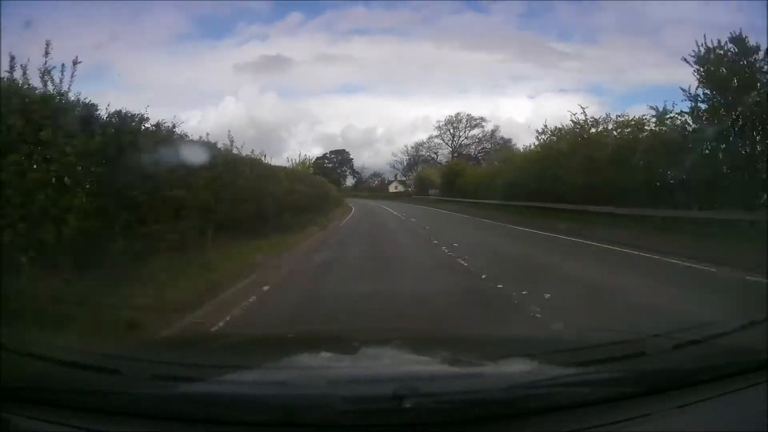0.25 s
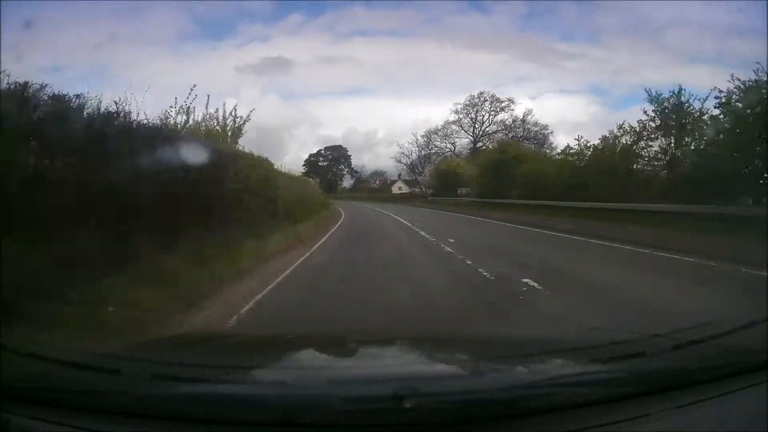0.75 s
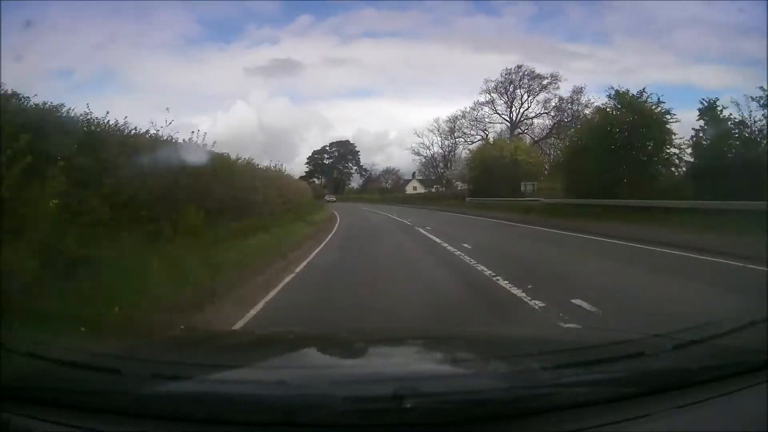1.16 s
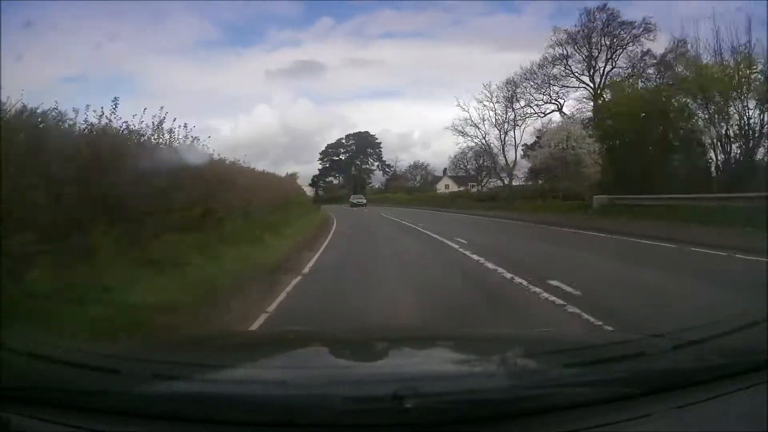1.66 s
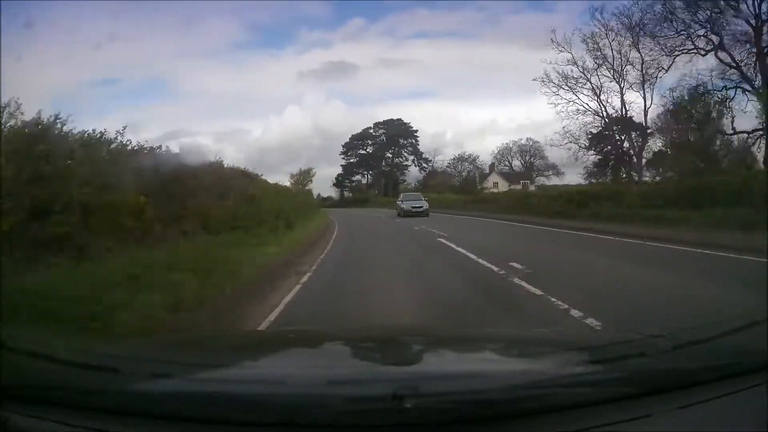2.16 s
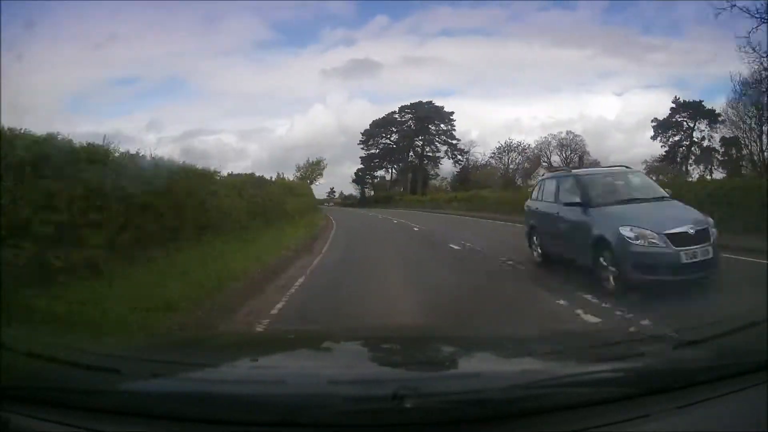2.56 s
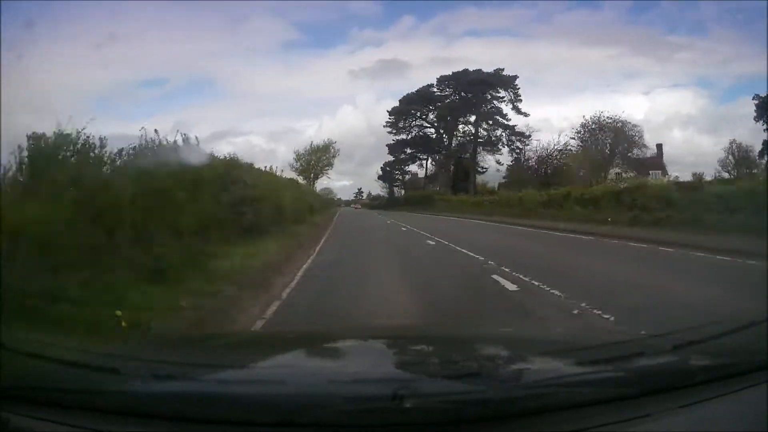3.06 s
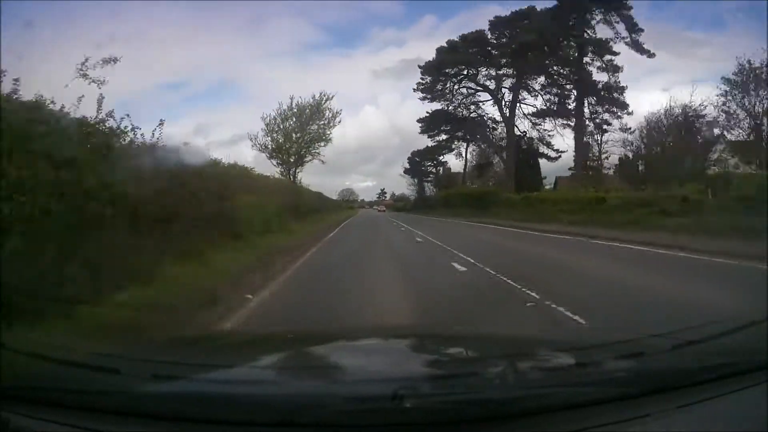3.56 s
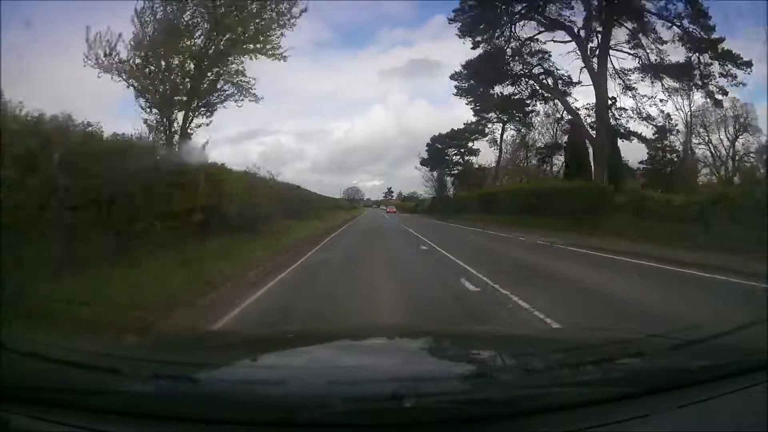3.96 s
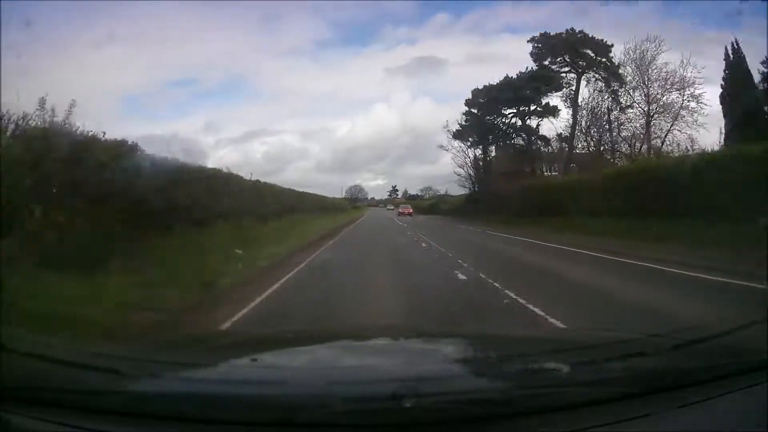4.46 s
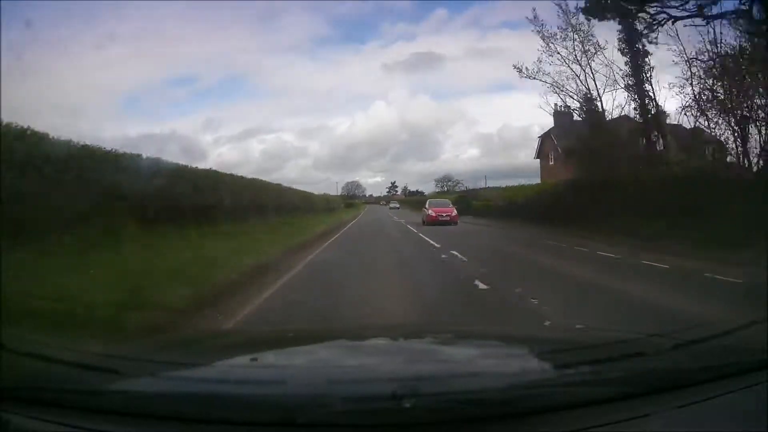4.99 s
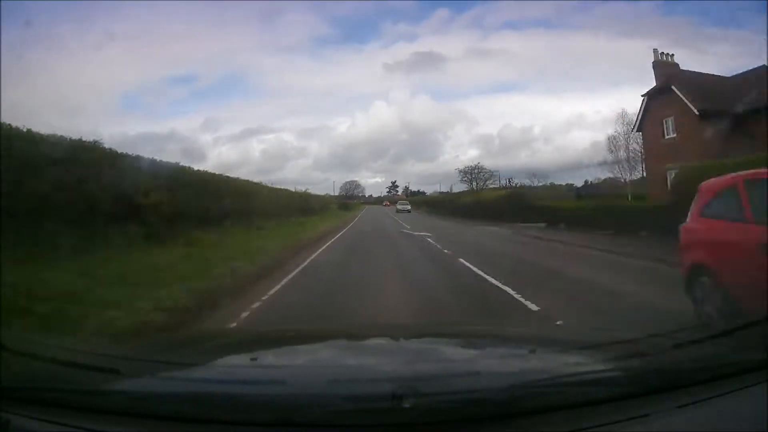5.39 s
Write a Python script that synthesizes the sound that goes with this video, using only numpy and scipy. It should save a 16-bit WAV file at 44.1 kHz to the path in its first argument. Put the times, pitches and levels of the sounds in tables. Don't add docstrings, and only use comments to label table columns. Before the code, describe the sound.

Continuous enclosed cabin noise: deep rumble, broad tyre roar and thin wind hiss. Very near the microphone, a brittle plastic part knocks and scrapes in irregular bright ticks, busiest midway, then sparse and gone after four seconds. Under it a five-cylinder engine hums, eases off and dips, then opens up smoothly, growing rougher and louder while its pitch climbs a little. One sharp stone flick sounds before the pull.

```python
import sys
import numpy as np
from scipy import signal
from scipy.fft import rfft, irfft, next_fast_len
from scipy.io import wavfile
from scipy.ndimage import uniform_filter1d

SR = 44100
rng = np.random.default_rng(int(sys.argv[2]) if len(sys.argv) > 2 else 0)


def unload_wav(signal):
    wavfile.write(
        sys.argv[1],
        SR,
        np.round(np.clip(np.atleast_2d(signal).T, -1, 1) * 32767).astype(np.int16),
    )


def volts(x):
    e = np.asarray(x, float) / 20
    return 10 ** e


N = 248283

# (time [s], level [dB])
THROTTLE = [
    (0, 8.5),
    (1.2, 6.5),
    (2.25, 3.5),
    (2.62, 12),
    (2.9, 18.5),
    (3.7, 22),
    (4.4, 25.5),
    (5.1, 26),
    (5.63, 25),
]
# (time [s], firing rate [Hz])
PACE = [(0, 131.6), (.62, 130.1), (1.56, 127.4), (2.19, 125.3), (3.12, 125.7), (4.06, 128.1), (4.69, 131),
        (5.31, 134.6), (5.63, 135.3)]


def rms_one(x):
    return x / np.sqrt(np.mean(x ** 2) + 1e-20)


def in_time(rows):
    s, value = np.transpose(rows)
    return np.interp(np.arange(N) / SR, s, value)


def drift(rate):
    r = np.exp(-80 * np.pi * rate / SR)
    noise = rng.standard_normal(N // 40 + 2002)
    slow = signal.lfilter([1], [1, -2 * r, r * r], noise)[2000:]
    return np.interp(np.arange(N) / 40, np.arange(len(slow)), rms_one(slow))


def ring(clicks, hz, t60):
    r = volts(-60 / (max(t60, .002) * SR))
    w = 2 * np.pi * hz / SR
    return signal.lfilter([0, np.sin(w)], [1, -2 * r * np.cos(w), r * r], clicks + 1e-18)


def lift(hz, peaks):
    return sum(lift_db / (1 + (2 * (hz - top) / width) ** 2) for top, width, lift_db in peaks)


def coloured(spectrum):
    # (centre [Hz], width [Hz], lift [dB])
    cabin = [(887, 17, 7.5), (940, 18, 4), (2513, 390, -6.5), (3320, 48, 8.5), (4370, 790, 9),
             (5530, 490, 13.5), (6950, 300, 6.5), (7500, 1800, 2.5)]
    size = next_fast_len(N)
    hz = np.arange(1, size // 2 + 2) * SR / size
    points_hz, points_db = np.transpose(spectrum)
    level_db = np.interp(np.log(hz), np.log(points_hz), points_db, left=-90, right=-90)
    level_db += lift(hz, cabin)
    return rms_one(irfft(rfft(rng.standard_normal(size)) * volts(level_db), size)[:N])


def body_rumble(texture):
    # (frequency [Hz], level [dB per Hz])
    rumble_spectrum = [(20, -14), (40, -3.5), (65, -10.5), (105, -3.5), (130, 4), (170, -4), (260, -38.5)]
    return volts(-35.5 + 1.5 * texture) * coloured(rumble_spectrum)


def wind_hiss(texture):
    # (frequency [Hz], level [dB per Hz])
    wind_spectrum = [(1500, -1.5), (2000, -6.5), (2500, 7.5), (3000, -11), (5000, -24.5), (7600, -34.5),
                     (8300, -44), (9000, -43.5), (9700, -51), (11200, -37), (12000, -36.5), (13000, -40.5),
                     (15700, -48)]
    faster_hz = in_time(PACE) - 127.8
    wind_db = -42.5 + 0.3859 * faster_hz + 0.09 * in_time(THROTTLE)
    return volts(wind_db + 0.19 * texture + 1.36 * drift(50)) * coloured(wind_spectrum)


def tyre_roar(texture):
    # (time [s], level [dB])
    tarmac = [(0, -18.5), (.38, -18.5), (.75, -20.5), (1.22, -17.5), (2.07, -21), (2.4, -19), (2.76, -20.5),
              (3.23, -19.5), (4.23, -21.5), (4.59, -18), (4.94, -18.5), (5.63, -17.5)]
    # (frequency [Hz], level [dB per Hz])
    tyre_spectrum = [(260, -29.5), (450, -20), (515, -15), (629, -10), (684, -12.5), (739, -8), (957, -3.5),
                     (1260, -8.5), (1460, -17.5), (1530, -17), (2100, -34), (2730, -64.5), (4620, -120)]
    return volts(in_time(tarmac) + 0.37 * texture + 0.45 * drift(36)) * coloured(tyre_spectrum)


def stone():
    # (time [s], level [dB])
    touches = [
        (2.6210, -1),
        (2.6255, -6),
        (2.6290, -9),
        (2.6350, -14),
        (2.6432, -15),
    ]
    # (frequency [Hz], level [dB], fade by 60 dB [s])
    panel = [(1070, 2, 0.0089), (1390, 7, 0.0032), (1910, -9.5, 0.032), (2520, 1.5, 0.014),
             (2580, 6, 0.0036), (3220, -6, 0.008), (4030, -5.5, 0.0076), (4210, -5.5, 0.0075),
             (4430, -6.5, 0.0065), (5700, -21, 0.015), (6550, -25, 0.0071), (7600, -25, 0.011),
             (11400, -27, 0.0069), (14000, -42, 0.0053)]
    out, force = np.zeros(N), np.zeros(N)
    steps = np.arange(1500)
    for s, db in touches:
        grit = rng.standard_normal(1500) * np.exp(-steps / 300)
        touch = (steps == 0) + .09 * grit
        if s > touches[0][0]:
            touch = signal.lfilter([1, -1], [1, -.75], touch)
        start = int(s * SR)
        force[start:start + 1500] += volts(db - 4) * touch
    for k, (hz, level_db, t60) in enumerate(panel):
        out += volts(level_db) * ring(force, hz, t60) * (-1) ** k
    return out


def rattles():
    # (time [s], peak [dB], top
    # modes [dB], scrape before the hit [ms], scrape level [dB])
    trim_hits = [(.0083, -22, -33, 12, -28), (0.1175, -19.5, -11, 12, -8), (0.165, -17.5, -22, 1.4, -32),
                   (.35, -37, -31.5, 2.6, -38), (.43, -33, -21, 4.6, -4), (.5023, -25, -31, 3.1, -39),
                   (0.5242, -21.5, -26.5, 5.7, -33), (0.641, -19, -9, 5.7, -30), (0.6484, -22, -15, 5.1, -25),
                   (1.072, -22, -14, 4, -34.5), (1.121, -19.5, -16, 2.4, -10), (1.149, -21.5, -12, 3.8, 0.5),
                   (1.1789, -20.5, -13, 2.4, 4.5), (1.2105, -27, -37, 4, -32), (1.3078, -17.5, -11, 4, -33.5),
                   (1.338, -22, -15, 12, -28.5), (1.3996, -16.5, -10.5, 9.5, -14), (1.478, -22, -17, 4.7, -32),
                   (1.5602, -15.5, -9, 6.4, -12), (1.585, -19.5, -13, 3.6, -35), (1.668, -12.5, -7, 2.9, -15),
                   (1.6964, -18, -11, 4.3, -18), (1.7223, -19.5, -13.5, 5.9, -25), (1.88, -28, -20, 4.5, -34),
                   (1.9111, -12.5, -10.5, 6.6, -18), (1.9909, -6, -13, 1.9, -17), (2.047, -16.5, -13, 2.6, -0.5),
                 (2.123, -14.5, -12, 5.2, -10), (2.1535, -13.5, -9, 9.4, -27), (2.194, -28.5, -12.5, 3.6, 0),
                 (2.2386, -10, -14, 9.5, -18), (2.28, -23.5, -12, 6.1, 3.5), (2.329, -9, -11.5, 5, -19),
                 (2.3764, -12.5, -15, 1.4, -15.5), (2.411, -16.5, -13, 1.1, 0.5), (2.418, -15, -26, 1.9, -28),
                 (2.4223, -20.5, -27, 4.7, -30), (2.512, -8.5, -12.5, 6.5, -18.5),
                 (2.561, -9.5, -13, 5.4, -29), (2.612, -13, -14, 5, -9), (2.6526, -22, -15.5, 9.7, -28),
                 (2.6805, -18, -17.5, 6.5, -30), (2.7258, -20, -18, 6.4, -30), (2.8, -32, -15, 9, 1),
                   (2.858, -11, -13.5, 2.7, -8), (2.908, -13.5, -11, 4.3, -7), (2.9478, -17, -13, 3.8, -0.5),
                  (2.9955, -12.5, -17, 1.4, -7.5), (3.0458, -14, -16, 5.1, -10.5), (3.08, -18, -15, 4, -22),
                  (3.1235, -27, -19, 2.8, -32), (3.15, -20, -14, 3.6, -28), (3.2186, -11, -14, 5.8, -17),
                  (3.2973, -9.5, -12, 6.2, -23), (3.3464, -14.5, -15, 5.3, -5.5), (3.6737, -19, -9, 6.6, -30),
                  (3.755, -23.5, -15, 14, -24), (3.95, -15, -10.5, 3.3, -32), (4.01, -23, -16, 8.7, -28),
                  (4.074, -20.5, -16, 2.6, -30)]
    # (offset from the hit [s], loss [dB])
    chatter = [
        (-.012, 29),
        (.010, 35),
    ]
    s, peak_db, top_db, lead_ms, lead_db = np.transpose(trim_hits)
    luck = rng.standard_normal((len(s), 3))
    low_db = -2 + 0.49 * (peak_db + 13) - .25 * (top_db + 17) + 2 * luck[:, 0]
    rows = [(s, peak_db, low_db, top_db, lead_ms, lead_db)]
    one = np.ones(len(s))
    for k, (offset_s, loss_db) in enumerate(chatter):
        tap_s = np.maximum(s + offset_s * (1 + .25 * luck[:, 1 + k]), .013)
        rows.append((tap_s, peak_db - loss_db, -6 * one, -1.5 * one, 2.4 * one, -30 * one))
    return np.hstack(rows)


def trim():
    # (frequency [Hz], level [dB], fade by 60 dB [s])
    plastic = [(1870, -3, .005), (2250, 2, .008), (2500, 6, .009), (2800, -1, .008), (3370, -4, .009),
               (4000, -3, .008), (4450, -1, .007), (4800, -6, .007), (5280, -16, .01), (5820, -8, .008),
               (6500, -12, .008), (7250, -20, .006), (7700, -18, .008), (10150, -4, .006),
               (10900, -8, .008), (11700, -1, .005), (12750, -9, .008), (13250, -4, .006),
               (13900, -4, .006), (14850, -1, .005), (15500, -14, .005)]
    soft_db, soft_slope = -13, .6
    buzz_db, buzz_s = -56, 0.041
    s, peak_db, low_db, top_db, lead_ms, lead_db = rattles()
    at = (s * SR).astype(int)
    lead = np.clip(lead_ms * SR / 1000, 1, 480).astype(int)

    steps = np.arange(700)
    since_hit = steps - lead[:, None]
    grit = rng.standard_normal((len(at), 700)) * (rng.random((len(at), 700)) < .25)
    rub = .5 * grit * np.exp(np.minimum(since_hit, 0) / 300) * (since_hit < 0)
    tick = 0.9 * (steps == 0)
    scrape = volts(lead_db + 5)[:, None] * (rub + tick)
    settle = .2 * grit * np.exp(-np.maximum(since_hit, 0) / 50) * (since_hit > 0)
    blows = scrape + (since_hit == 0) + settle
    spots = (at - lead)[:, None] + steps
    share_db = rng.normal(0, 1.0, (len(at), len(plastic)))

    shaken, span = np.zeros(N), int(buzz_s * SR)
    np.add.at(shaken, at, volts(peak_db) * span)
    shaking = uniform_filter1d(uniform_filter1d(shaken, span), span)
    buzz = volts(buzz_db) * shaking * rng.standard_normal(N)

    out = np.zeros(N)
    for k, (hz, level_db, t60) in enumerate(plastic):
        colour_db = low_db * ((hz < 3600) - .3 * (5000 < hz < 9000)) + top_db * (hz > 9000)
        softness_db = soft_slope * np.minimum(peak_db - soft_db, 0)
        colour_db = colour_db + softness_db * np.clip(hz / 3000 - 4, 0, 1)
        force = buzz * volts(level_db * (hz < 3600) - 13.0 * (hz > 9000) - 9.3 * (hz > 6000))
        blow_db = peak_db + colour_db + level_db - 6.5 - 3 * (5000 < hz < 7000) + share_db[:, k]
        np.add.at(force, spots, blows * volts(blow_db)[:, None])
        out += ring(force, hz, t60) * (-1) ** k
    return out


def intake_and_pull():
    # (frequency [Hz], level [dB per Hz])
    intake_spectrum = [(140, -47.5), (190, -7.5), (260, -5), (330, -2), (410, 1), (490, -7), (600, -13.5)]
    # (frequency [Hz], level [dB per Hz])
    pull_spectrum = [(480, -14), (580, -7), (650, -8), (693, -1.5), (750, -9.5), (1850, -33.5), (1970, -33),
                     (2400, -27.5), (3000, -38)]
    intake_db = -25.5 + 0.19 * in_time(THROTTLE)
    intake = volts(intake_db - 5.5 + 0.57 * drift(4)) * coloured(intake_spectrum)
    pull = volts(2 * intake_db + 19.0) * coloured(pull_spectrum)
    return intake + pull


def engine():
    # (time [s], level [dB])
    firing_boom = [(0.02, -25), (0.65, -26.5), (1.64, -24), (1.67, -27), (1.97, -24), (2.12, -33),
                   (2.14, -27), (2.21, -24), (2.28, -42), (2.32, -29), (2.4, -20), (2.43, -25),
                   (2.96, -23.5), (4.94, -26), (5.45, -22), (5.57, -28)]
    # (waves per two-turn cycle, level relative to the load [dB])
    uneven = [(4, -13), (9, -7), (14, 2), (16, -8), (17, 0), (20, -11), (24, -9)]
    # (centre [Hz], width [Hz], lift [dB])
    pipe = [(254.6, 12, 6), (407, 27, 17)]
    # (centre [Hz], width [Hz], lift [dB])
    cabin_boom = [(423.7, 57, 11)]
    firing_hz, throttle_db = in_time(PACE), in_time(THROTTLE)
    cycle = 2 * np.pi * np.cumsum(firing_hz) / SR / 5
    first_db = in_time(firing_boom) + 0.47 * drift(7.2)
    second_db = -47.5 + 0.44 * throttle_db + lift(2 * firing_hz, pipe)
    third_db = -48.5 + 0.47 * throttle_db + lift(3 * firing_hz, pipe)
    load_db = -57 + throttle_db
    # (waves per cycle, level [dB], wobble [dB])
    orders = [(5, first_db, 0.13), (10, second_db, 1.3), (15, third_db, 0.5)]
    for order, db in uneven:
        orders.append((order, load_db + db + lift(order * firing_hz / 5, cabin_boom), 1.1))
    out = np.zeros(N)
    for order, level_db, wobble_db in orders:
        phase = rng.uniform(0, 2 * np.pi) + .12 * drift(5)
        size = np.sqrt(2) * volts(level_db + wobble_db * drift(2.4))
        out += size * np.sin(order * cycle + phase)
    return out


def scene():
    texture = drift(14)
    background = body_rumble(texture) + wind_hiss(texture) + tyre_roar(texture)
    return (background + stone() + trim() + intake_and_pull() + engine())[None]


def roll_off(x):
    return signal.sosfilt(signal.butter(12, 16230, fs=SR, output="sos"), x)


def record(dry):
    dip = signal.lfilter(*signal.iirnotch(9000, 4.0, fs=SR), dry)
    mix = 1.01 * np.tanh(dip / 0.97)
    return roll_off(mix)


dry = scene()
out = record(dry)
unload_wav(out)
```